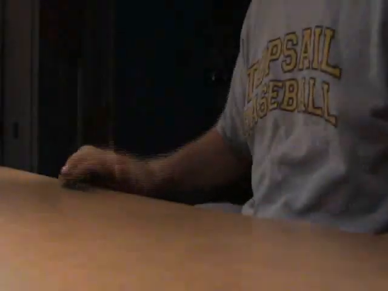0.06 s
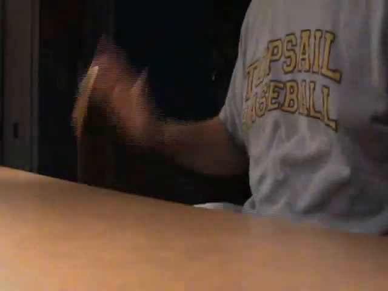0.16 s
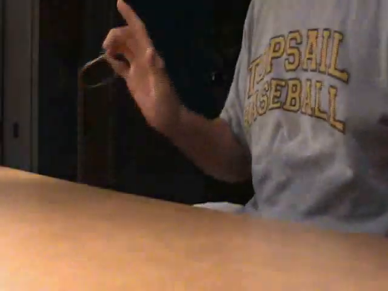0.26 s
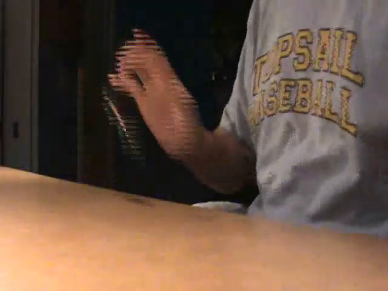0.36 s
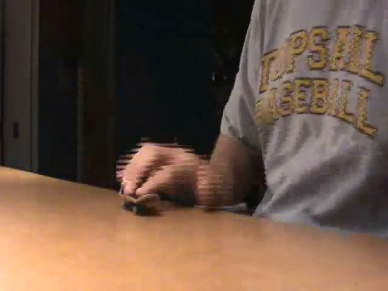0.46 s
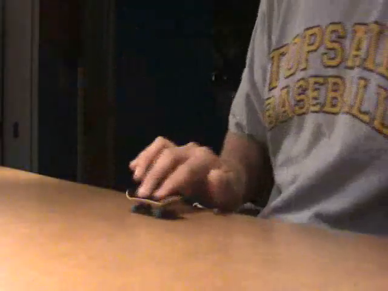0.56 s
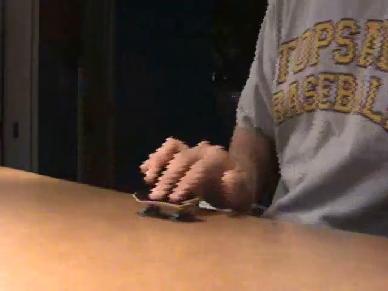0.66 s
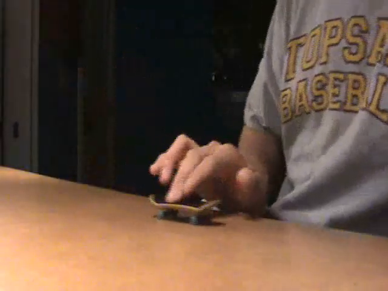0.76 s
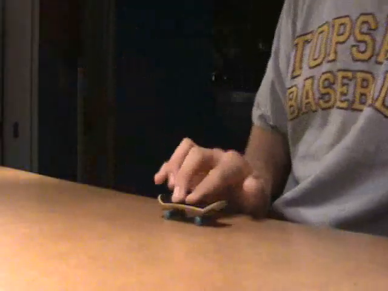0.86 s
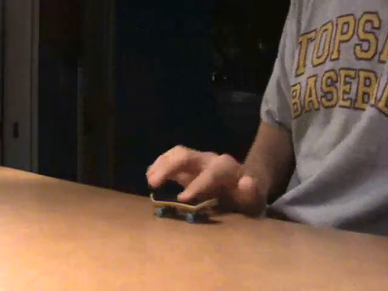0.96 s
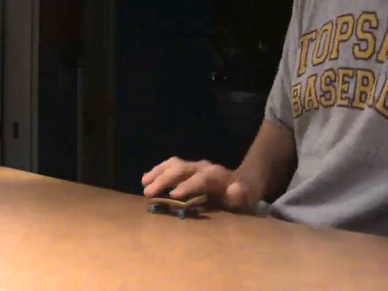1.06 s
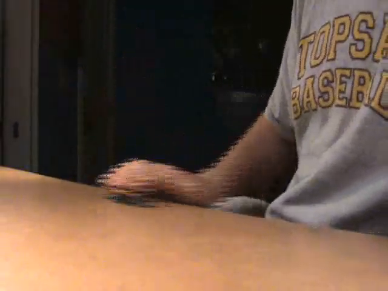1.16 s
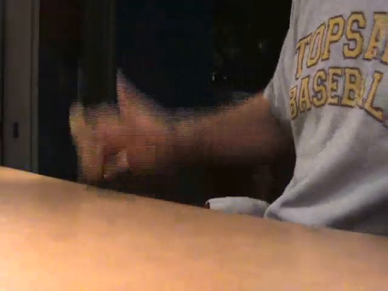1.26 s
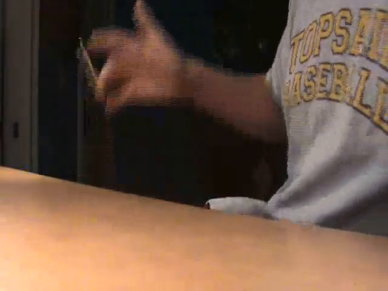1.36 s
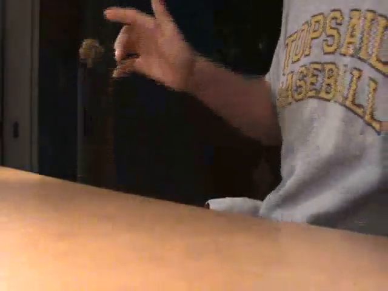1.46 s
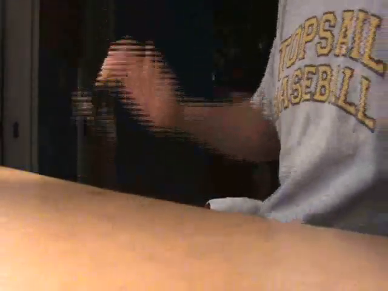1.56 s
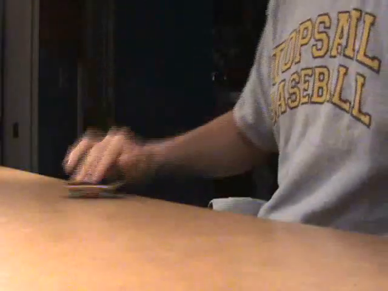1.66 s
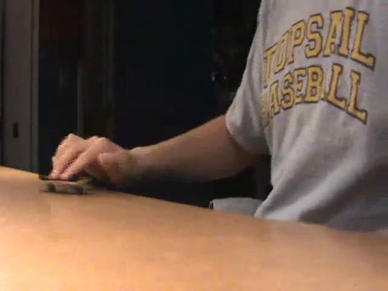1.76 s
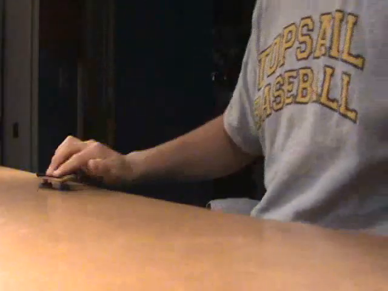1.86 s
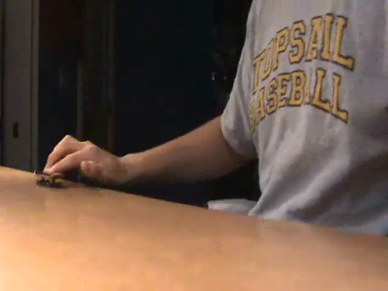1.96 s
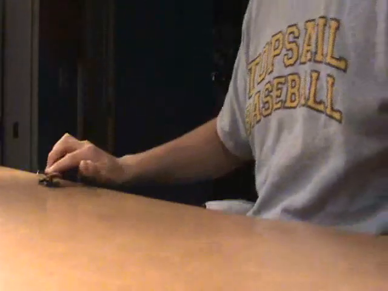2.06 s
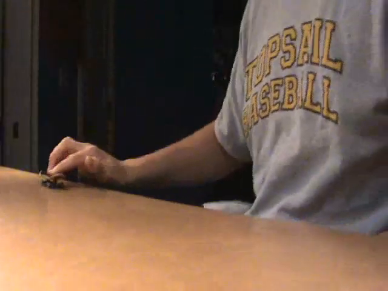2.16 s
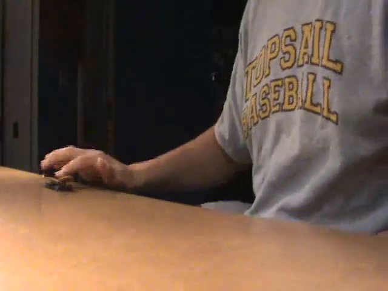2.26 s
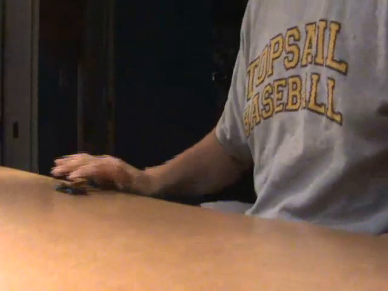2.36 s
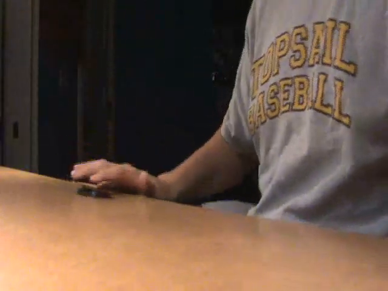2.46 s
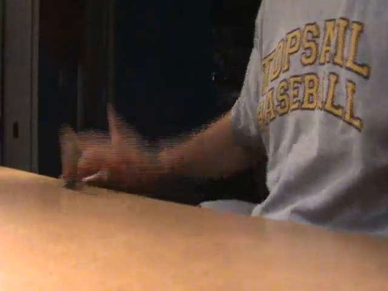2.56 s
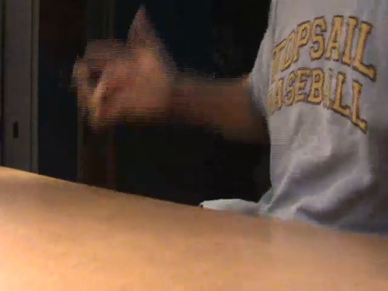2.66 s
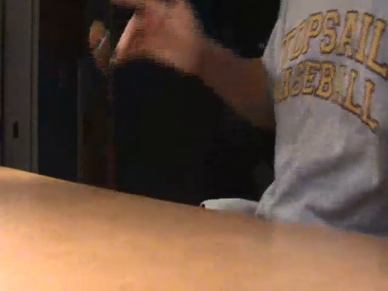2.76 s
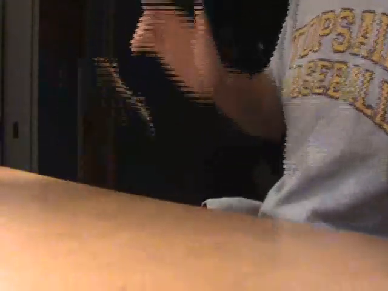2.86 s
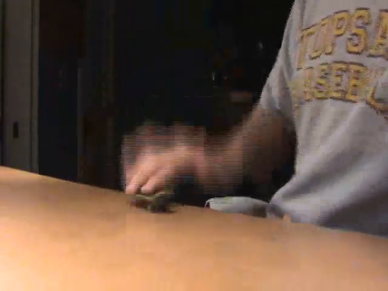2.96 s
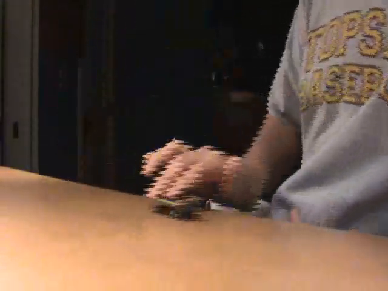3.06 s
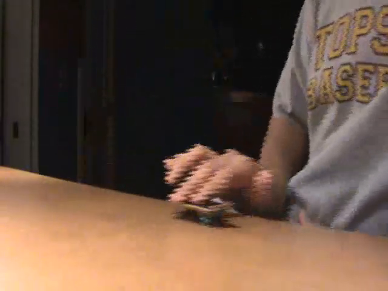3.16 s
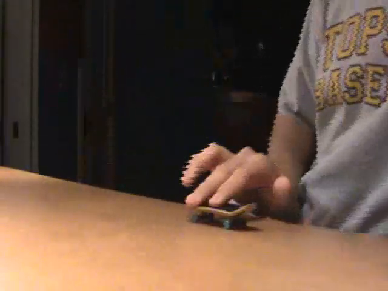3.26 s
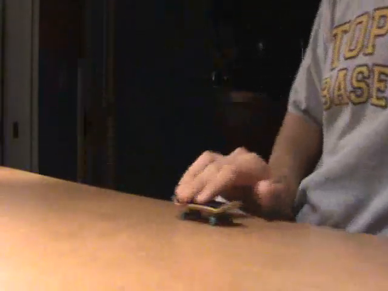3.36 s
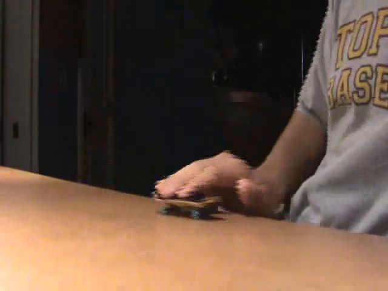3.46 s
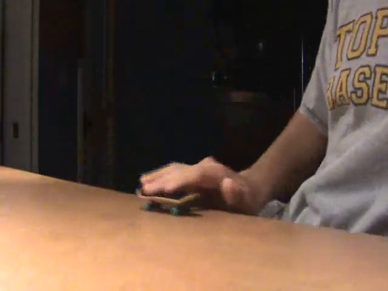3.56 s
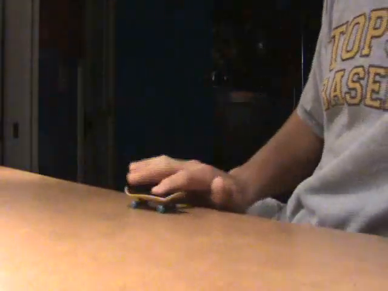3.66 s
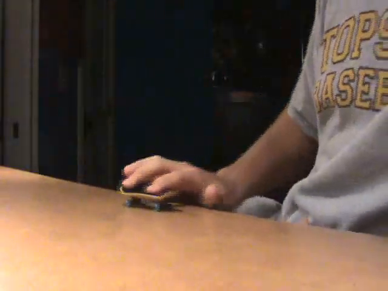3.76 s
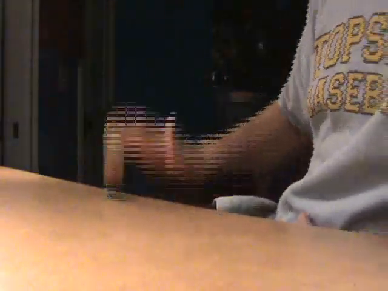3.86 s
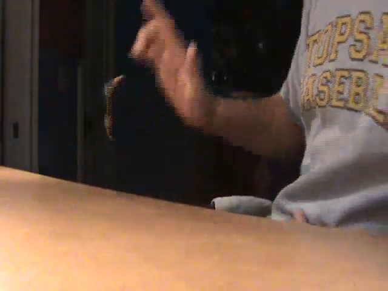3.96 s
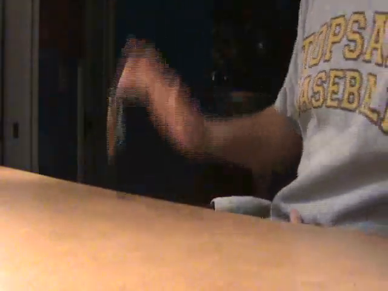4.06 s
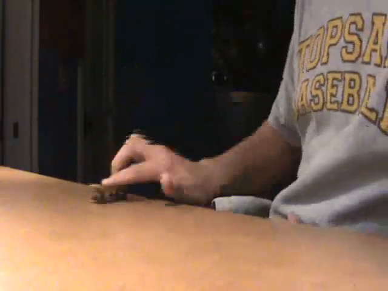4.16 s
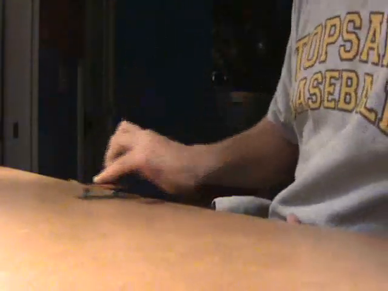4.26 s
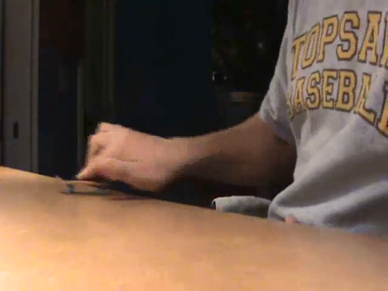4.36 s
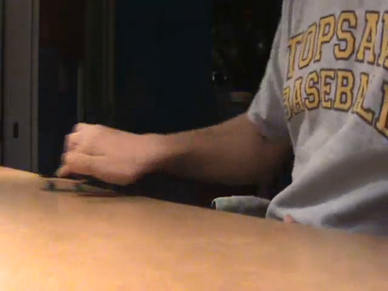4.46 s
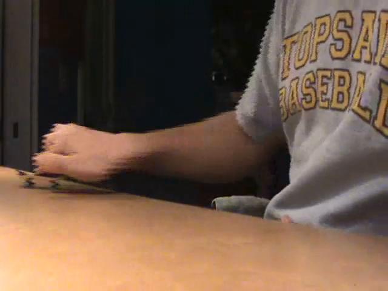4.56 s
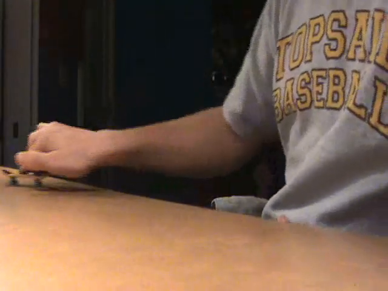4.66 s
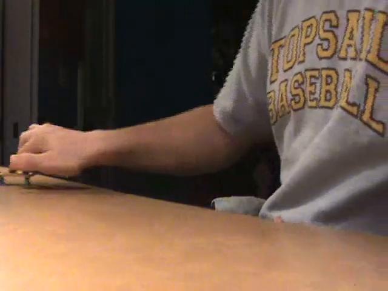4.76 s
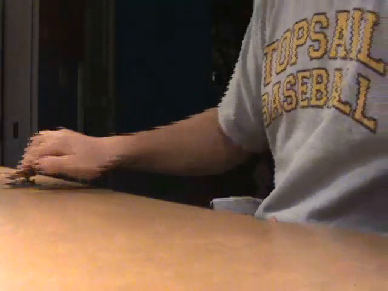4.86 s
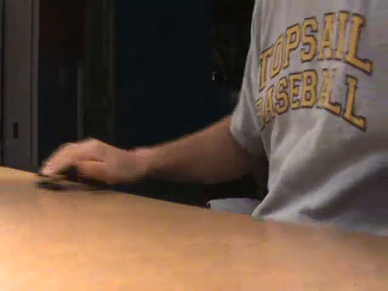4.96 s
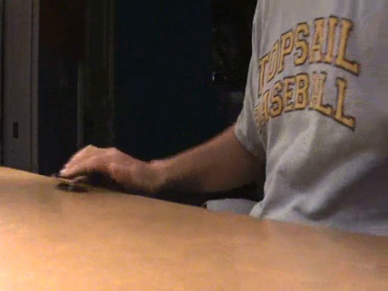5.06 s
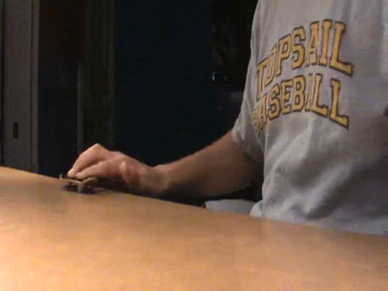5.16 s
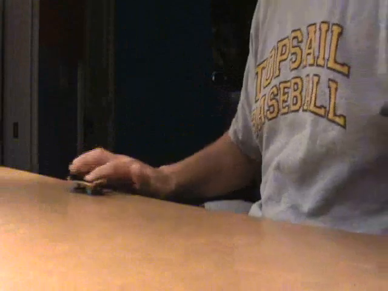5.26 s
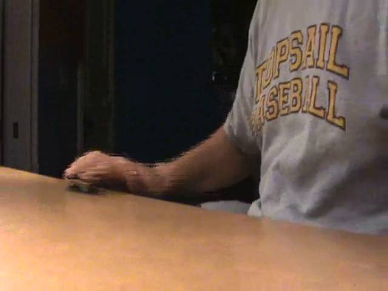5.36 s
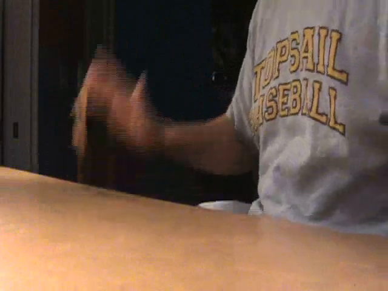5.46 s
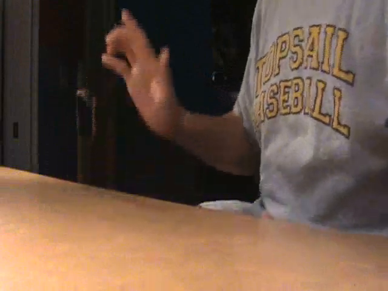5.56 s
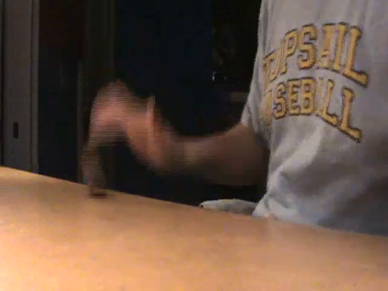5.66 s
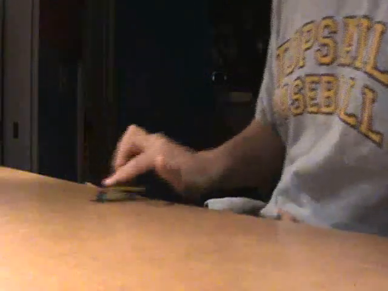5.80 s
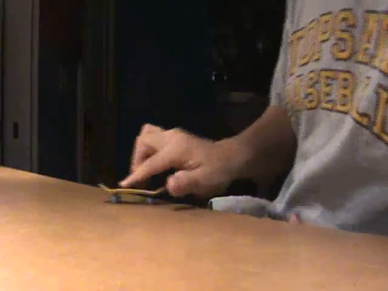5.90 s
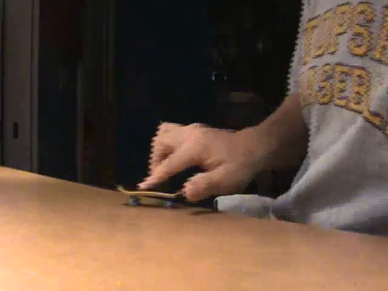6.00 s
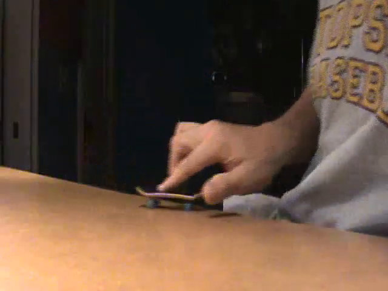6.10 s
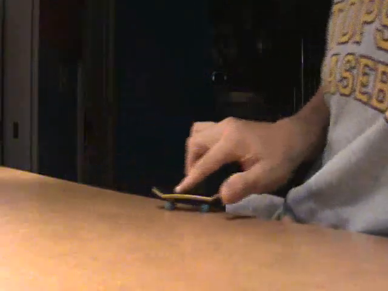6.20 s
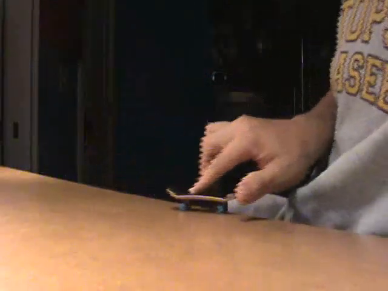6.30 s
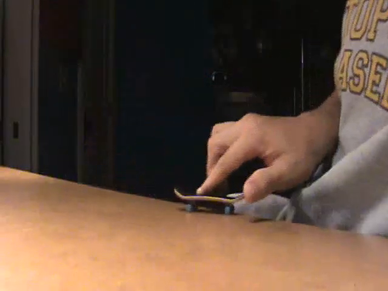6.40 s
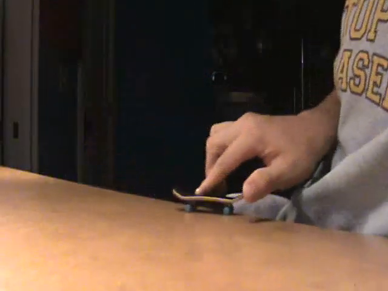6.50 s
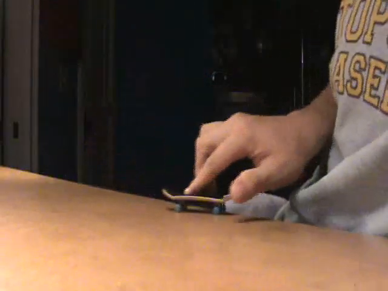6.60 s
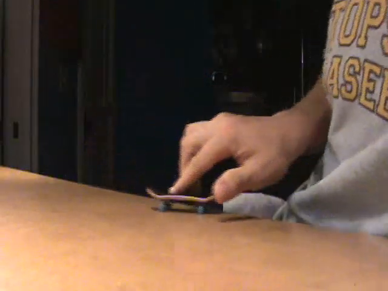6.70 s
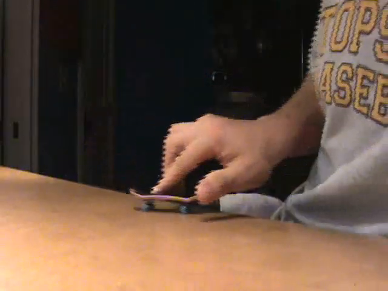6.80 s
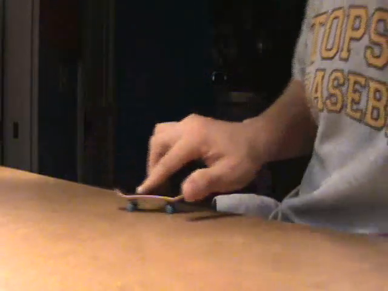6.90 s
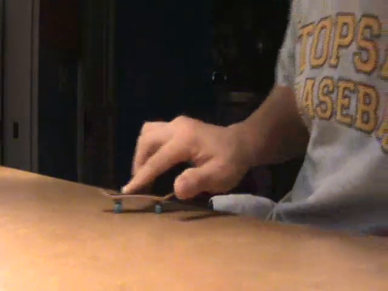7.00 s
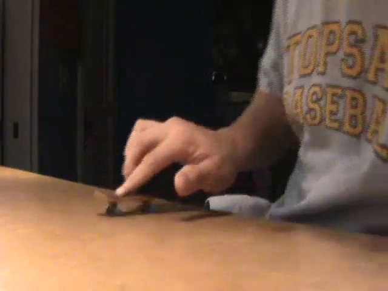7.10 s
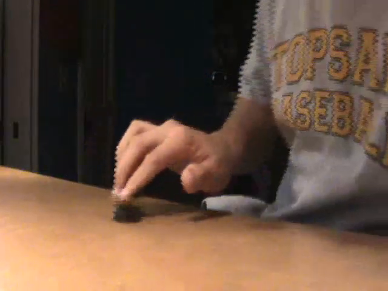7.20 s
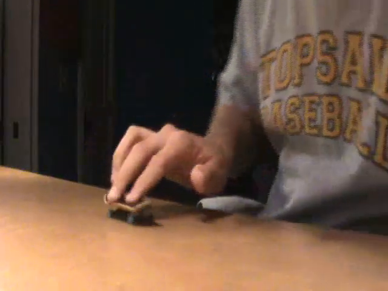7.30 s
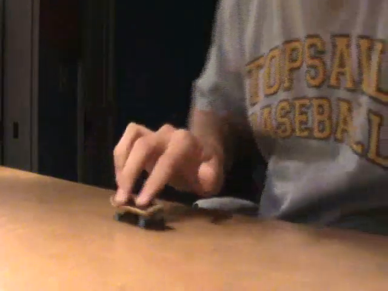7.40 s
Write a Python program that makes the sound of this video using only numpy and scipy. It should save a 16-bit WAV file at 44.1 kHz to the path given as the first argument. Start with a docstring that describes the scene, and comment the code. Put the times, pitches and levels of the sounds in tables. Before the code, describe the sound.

Close to a wooden table in a small live room, a toy skateboard rolls to and fro with a grainy, hollow drone. Five times its tail snaps brightly, the rolling stops for about a third of a second, then trucks and deck hit in sharp clustered clacks with rattling wheels. Soft finger thuds and faint swishes lie beneath; quiet room noise, low hum and thin whine continue.

```python
"""A small room, microphone close to a table: a fingerboard rolls to and fro on the table top.
Five times its tail snaps on the wood as a few short rings, it flies, lands in sharp blows of
trucks and deck on chattering wheels, and rolls on. Rolling is dense random impacts passed through
the top's resonances, so the table drones; an echo and a diffuse tail answer the board's sounds.
Soft thuds, swishes and a low rub lie beneath, over steady room noise, a hum and a thin whine."""
import sys
import numpy as np
from scipy import signal
from scipy.fft import rfft, irfft, next_fast_len
from scipy.io import wavfile
from scipy.ndimage import map_coordinates

SR = 44100
rng = np.random.default_rng(int(sys.argv[2]) if len(sys.argv) > 2 else 0)


def bounce(signal):
    """Save signal as a 16-bit WAV file at the path given by the first command-line argument."""
    frames = np.transpose(np.atleast_2d(signal))
    limited = np.clip(frames, -1, 1)
    pcm = np.round(limited * 32767).astype(np.int16)
    wavfile.write(sys.argv[1], SR, pcm)


N = 328104

# the tail snaps on the table: (time [s], snap level [dB], swish level [dB])
SNAPS = [(.295, -4, -42), (1.4412, -4.5, -38.5), (2.7675, -6, -38.5), (4.061, -6, -46), (5.6157, -6, -45.5)]
# the board comes down on its two trucks and slaps flat; each contact rebounds once:
# (first truck [s], second truck [s], truck level [dB], truck tilt [dB per octave], slap [s],
#  slap level [dB], slap tilt [dB per octave], rebound after [s], rebound loss [dB])
TOUCHDOWNS = [(0.6152, 0.645, -5, -1, .652, -7.5, -4.5, .0135, 9),
              (1.818, 1.835, -5.5, -3.5, 1.868, -6, -3, 0.014, 14),
              (3.146, 3.155, -7.5, -1.5, 3.15, -5, -3.5, .016, 8),
              (4.331, 4.337, -6.5, -1.5, 4.359, -10.5, 10, .008, 10),
              (5.8773, 5.898, -6, 2, 5.95, -6, -6, .008, 0.5)]


def amp(db):
    """Decibels to gain."""
    return 10 ** (np.asarray(db) / 20)


def unit(x):
    """Scale to rms 1."""
    return x / np.sqrt(np.mean(x ** 2) + 1e-20)


def along(points, hz):
    """Read (Hz, value) points on a log axis."""
    f, v = np.transpose(points)
    return np.interp(np.log(hz + 1), np.log(f + 1), v)


def clock():
    """The time of every sample [s]."""
    return np.arange(N) / SR


def add(track, s, sound):
    """Mix a sound into a track at time s."""
    part = track[max(round(s * SR), 0):][:len(sound)]
    part += sound[:len(part)]


def wobble(rate):
    """A smooth random curve, rate knots a second."""
    knots = np.random.default_rng(rng.integers(2 ** 30)).standard_normal(int(N * rate / SR) + 4)
    return map_coordinates(knots, [clock() * rate], mode="nearest")


def filtered(x, response):
    """x times a response of frequency."""
    n = x.shape[-1]
    m = next_fast_len(n + SR // 2, True)
    return irfft(rfft(x, m) * response(np.fft.rfftfreq(m, 1 / SR)), m)[..., :n]


def causal(gain_db, size=1024):
    """The impulse response with this gain that starts at once (minimum phase)."""
    cepstrum = irfft(np.log(amp(gain_db(np.fft.rfftfreq(size, 1 / SR)))))
    cepstrum[1:size // 2] *= 2
    cepstrum[size // 2 + 1:] = 0
    return irfft(np.exp(rfft(cepstrum)))


def bumps(rate, size=N):
    """Tiny impacts at random moments, about rate a second; rms 1."""
    return unit((rng.random(size) < rate / SR) * rng.standard_normal(size))


def on_table(x, spectrum):
    """Colour a contact force and pass it through the table top's resonances; rms 1."""
    # resonances and dips of the top: (centre [Hz], width [Hz], lift [dB])
    top = [(229.5, 20, 10), (495.6, 10, 6), (838.6, 13, 6.5), (1078, 190, 5), (1252, 14, 3.5),
           (1414, 50, -1.5), (1547, 18, 7.5), (1730, 66, 5), (1970, 69, 1.5), (2970, 60, -1.5),
           (4140, 80, -1)]

    def gain(hz):
        lift_db = sum(db / (1 + (2 * (hz - centre) / width) ** 2) for centre, width, db in top)
        return amp(along(spectrum, hz) + lift_db)

    return unit(filtered(x, gain))


def moving_band(x, centre_hz, sharpness, size=512):
    """A resonance, applied twice, whose centre and sharpness follow curves; rms 1."""
    hz, s, z = signal.stft(x, SR, nperseg=size)
    ratio = (hz[:, None] + 1) / np.interp(s, clock(), centre_hz)
    q = np.interp(s, clock(), sharpness * np.ones(N))
    gain = 1 / (1 + (q * (ratio - 1 / ratio)) ** 2)
    gain = gain / np.linalg.norm(gain, axis=0)
    return unit(signal.istft(z * gain, SR, nperseg=size)[1][:N])


def rolling():
    """Wheels cross the grain of the top; the drone shifts with each push and stops in the air."""
    # skidding wheels broaden the drone: (scrape relative to drone [dB], sharpness [Q])
    focus_points = [(-13, 2.9), (-3, 1.4)]
    # skidding wheels: (frequency [Hz], level [dB per Hz])
    scrape_spectrum = [(1200, -45), (1800, 3), (2200, 4.5), (2900, 0.5), (3800, -4.5), (4500, -6.5),
                       (5500, -21.5), (8000, -53)]
    # fine bright hiss of the wheels: (frequency [Hz], level [dB per Hz])
    grit_spectrum = [(2500, -21.5), (3800, -0.5), (4500, 2), (5600, -4), (7100, 2.5), (8400, -6),
                     (9700, -4.5), (11000, -21.5), (13000, -55)]
    # hollow rumble of the top: (frequency [Hz], level [dB per Hz])
    rumble_spectrum = [(25, -33), (60, -24), (150, -33), (300, -10.5), (550, 0.5), (680, -1), (820, 3),
                       (1050, -6.5), (2000, -13), (5000, -68)]
    drone_gain, rumble_gain, scrape_gain, grit_gain, centre_hz = wheel_levels()
    flutter = wobble(109.8)  # wheels slightly out of round; knots a second
    lurch = amp(0.44 * wobble(22))  # the fingers press unevenly
    focus = np.interp(20 * np.log10(scrape_gain / drone_gain), *np.transpose(focus_points))
    force = on_table(bumps(12000), [(600, -2.5), (950, -2), (1700, 2), (2300, -1)])
    drone = moving_band(force, centre_hz, focus) * drone_gain * amp(1.25 * flutter - 1.0)
    rumble = on_table(bumps(8000), rumble_spectrum) * rumble_gain * amp(.91 * flutter - 2.5)
    scrape = on_table(bumps(18000), scrape_spectrum) * scrape_gain * amp(0.64 * flutter - 1.5)
    grit = on_table(bumps(18000), grit_spectrum) * grit_gain * amp(1.2 * flutter - 4)
    return on_ground() * (lurch * (drone + rumble) + scrape + grit)


def wheel_levels():
    """Pushes and skids add in power: gains of drone, rumble, scrape and grit, and the drone's centre."""
    # each push of the board: (start [s], time its speed curve peaks, which may lie just outside
    # the push [s], end [s], drone level [dB], build-up [dB], run-down [dB], drone centre [Hz],
    # rumble relative to drone [dB], hiss relative to drone [dB])
    pushes = [(0.101, .1, 0.11, -40, 3, 5, 1150, -4, -8),
              (0.173, 0.264, 0.27, -28, 11, 6.5, 1430, -10, -15.5),
              (.72, 0.735, 0.99, -26, -3, 15, 1374, -12.5, -12),
              (1.029, 1.039, 1.054, -29, 5, 6, 1320, -12.5, -18),
              (1.126, 1.34, 1.41, -22.5, 11, 4, 1406, -17.5, -12.5),
              (1.904, 2.077, 2.209, -23, -0.5, 10.5, 1245, -9, -9),
              (2.28, 2.302, 2.33, -40, 3, -0.5, 1210, -7.5, -20),
              (2.381, 2.47, 2.74, -29.5, 2, -1.5, 1120, -6.5, -12),
              (3.253, 3.27, 3.42, -28, -2.5, 12, 1450, -15, -10),
              (3.535, 3.55, 3.8, -31.5, 0.5, 5, 1340, -7, -10),
              (3.956, 4.005, 4.015, -17, 18.5, 4, 1560, -19.5, -19),
              (4.47, 4.53, 4.93, -25.5, 1.5, 3, 1467, -16, -10.5),
              (4.943, 4.95, 5.06, -22, 0.5, 10, 1355, -24, -16),
              (5.12, 5.216, 5.29, -27, 8, 8, 1050, -1.5, -9.5),
              (5.453, 5.555, 5.6, -28, 7, 5, 1450, -10, -14),
              (5.93, 6.02, 6.53, -25, 2, 11.5, 1310, -13.5, -16.5),
              (6.69, 6.72, 6.7, -45, 3, -2, 1220, -15, -26),
              (6.82, 6.92, 7.22, -32.5, 10.5, 10.5, 1265, -11.5, -16),
              (7.36, 7.412, 7.47, -26.5, 14.5, 5.5, 1550, -12.5, -11)]
    # wheels slip sideways in a turn or before a jump: (start [s], time towards which the slip
    # grows, which may lie past the end [s], end [s], scrape level [dB], grit level [dB])
    skids = [(0.23, 0.262, .28, -34, -36), (1.289, 1.402, 1.424, -23, -17.5),
             (2.042, 2.075, 2.134, -29.5, -50), (2.55, 2.62, 2.71, -29, -32.5),
             (2.69, 2.733, 2.75, -25.5, -31), (3.968, 4.028, 4.05, -20.5, -23),
             (4.983, 5.17, 5.274, -31.5, -31.5), (5.536, 5.566, 5.6, -33.5, -35),
             (6.094, 6.126, 6.27, -35.5, -35), (6.895, 6.9, 7.2, -51, -43), (7.11, 7.43, 7.4, -36.5, -37.5)]
    hiss_grows, rise_oct_per_db = 1.124, 0.0167  # with speed hiss outgrows drone, and drone rises
    # between pushes the board never quite rests
    creep_db, creep_hz, creep_rumble_db, creep_hiss_db = -50, 1285, -7.5, -12
    drone = np.full(N, amp(creep_db) ** 2)
    rumble = drone * amp(creep_rumble_db) ** 2
    hiss = drone * amp(creep_hiss_db) ** 2
    centre = drone * creep_hz  # weighted by power
    for start, curve_peak, end, db, build_db, run_down_db, hz, rumble_db, hiss_db in pushes:
        gate, speed_db = stroke(start, curve_peak, end, build_db, run_down_db)
        power = (gate * amp(db + speed_db)) ** 2
        drone += power
        centre += power * hz * 2 ** (rise_oct_per_db * speed_db)
        rumble += power * amp(rumble_db) ** 2
        hiss += (gate * amp(db + hiss_db + hiss_grows * speed_db)) ** 2
    # a bright hiss and a rumble die away at the outset
    scrape = hiss.copy()
    grit = hiss + amp(-30 - 187 * clock()) ** 2
    rumble += amp(-32.5 - 400 * clock()) ** 2
    for start, grows_towards, end, scrape_db, grit_db in skids:
        # the slip swells, and most skids ease before the wheels grip
        gate, slip_db = stroke(start, grows_towards, end, build_db=15, ease_db=6)
        power = (gate * amp(slip_db)) ** 2
        scrape += power * amp(scrape_db) ** 2
        grit += power * amp(grit_db) ** 2
    return *np.sqrt([drone, rumble, scrape, grit]), centre / drone


def stroke(start, curve_peak, end, build_db, ease_db):
    """One movement of the hand: its gate (0-1), and its strength curve [dB], 0 at curve_peak."""
    t = clock()
    start_s, stop_s = 0.027, .025  # wheels get going, come to rest
    gate = np.interp(t, [start - start_s, start, end, end + stop_s], [0, 1, 1, 0])
    return gate, np.interp(t, [start, curve_peak, end], [-build_db, 0, -ease_db])


def on_ground():
    """1 while the wheels touch the table, 0 from each pop to its landing."""
    t = clock()
    flights = [(t > snap[0]) & (t < landing[0]) for snap, landing in zip(SNAPS, TOUCHDOWNS)]
    return 1. - np.any(flights, axis=0)


def pops():
    """The hard tail hits once and its modes ring for a few milliseconds."""
    # ringing of the snapped tail, scattered at each hit: (mean frequency [Hz], mean level [dB], t60 [s])
    tail_modes = [(594, -25.5, 0.01), (1810, -20, 0.0037), (3290, -27, 0.012), (4450, -61, 0.0026),
                  (5570, -14.5, 0.0029), (6830, 4, 0.0023), (7390, -4, 0.0037), (9290, -1, 0.0022)]
    out, t = np.zeros(N), np.arange(SR // 20) / SR
    hz, db, t60 = np.transpose(tail_modes)[:, :, None]
    for s, level_db, _ in SNAPS:
        detune, strength = rng.standard_normal((2, len(tail_modes), 1))
        decay = amp(db + 1.0 * strength - 60 * t / t60)
        ring = np.sum(decay * np.sin(2 * np.pi * hz * (1 + 0.039 * detune) * t), axis=0)
        ring = ring * (1 - np.exp(-t / .0002))  # soften the onset
        add(out, s, amp(level_db) * ring / np.abs(ring).max())
    return out


def clacks():
    """Each contact is a sharp blow with a brief buzz of the trucks: noise dying at two rates."""
    # a blow: (frequency [Hz], level before tilt [dB per Hz])
    clack_spectrum = [(60, -29.5), (500, -7), (900, -13), (1700, 2.5), (2700, -7.5), (4000, -4),
                      (5300, -7.5), (6800, -1.5), (8300, -9.5), (9800, -6), (11500, -33), (14000, -55)]
    out, t = np.zeros(N), np.arange(SR // 30) / SR
    for s, db, tilt_db in contacts():
        decay = amp(-60 * t / .014) + amp(-19) * amp(-60 * t / .04)  # blow + buzz
        force = rng.choice([-1, 1], len(t)) * decay
        body = causal(lambda hz: along(clack_spectrum, hz) + tilt_db * np.log2(np.maximum(hz, 1000)))
        clack = signal.fftconvolve(force, body)
        add(out, s, amp(db + 11.0) * clack / np.linalg.norm(clack))
    return out


def contacts():
    """Every blow as (s, dB, tilt): jolts, a knock at each pop, three contacts a landing with rebounds."""
    # the board jolts under the fingers while it rolls:
    # (time [s], level [dB], treble tilt [dB per octave])
    jolts = [(.0949, -24.5, -4.5), (1.027, -31.5, 4), (3.53, -27, -6), (3.729, -16, -0.5),
             (4.94, -23, -2.5), (5.158, -17.5, 2), (5.361, -15.5, -3), (5.368, -19.5, -13),
             (5.543, -28, -12), (6.037, -13.5, -4.5), (6.713, -33, -13), (6.832, -35, -15),
             (6.878, -29.5, -1), (7.021, -25, -5), (7.406, -15, -3.5)]
    blows = jolts + [(s, -21, -9) for s, *_ in SNAPS]  # the deck knocks dully as its tail snaps down
    for first, second, truck_db, truck_tilt, slap, slap_db, slap_tilt, flight_s, loss_db in TOUCHDOWNS:
        trucks = [(first, truck_db, truck_tilt), (second, truck_db, truck_tilt)]
        for s, db, tilt in trucks + [(slap, slap_db, slap_tilt)]:
            blows += [(s, db, tilt), (s + flight_s, db - loss_db, tilt)]
    return blows


def chatter():
    """Dense tiny bounces swell until the fingers pin the board; they ring trucks and shake the table."""
    # after each landing the loose trucks chatter: (peak [s], level [dB], tilt [dB per octave],
    # truck ring [Hz], table boom level [dB])
    rattles = [(.722, -24, 0.2, 4400, -39), (1.914, -19.5, 0.3, 4300, -38),
               (3.215, -20.5, 1.2, 4500, -33.5), (4.402, -20, 0.3, 4000, -39),
               (5.96, -21, 1.5, 4460, -34.5)]
    # the bounces: (frequency [Hz], level before tilt [dB per Hz])
    bounce_spectrum = [(100, -8.5), (300, -5), (700, -1), (900, -2.5), (1200, 0), (2000, 0.5), (2900, 1.5),
                       (4000, -5), (5400, -7.5), (7000, -1.5), (8300, -8), (9700, -6), (11500, -13),
                       (13500, -41)]
    # the shaken table: (frequency [Hz], level [dB per Hz])
    boom_spectrum = [(20, -30), (40, -5.5), (70, -3), (102, -3.5), (150, -8.5), (230, -7.5), (500, -6),
                     (2000, -54)]
    rise_db_per_s, fall_db_per_s = 85, 305  # the chatter swells, then is pinned
    loose_share = .38  # strength before the deck slaps flat
    rattle, boom = np.zeros((2, N))
    for landing, (peak_s, db, tilt_db, truck_hz, boom_db) in zip(TOUCHDOWNS, rattles):
        first, slap = landing[0], landing[4]
        t = first + np.arange(round(.4 * SR)) / SR
        settling = np.interp(t, [slap - .012, slap], [loose_share, 1])
        below_peak_db = np.maximum(rise_db_per_s * (peak_s - t), fall_db_per_s * (t - peak_s))
        swell = settling * amp(-below_peak_db)
        colour = [(hz, level + tilt_db * np.log2(hz / 2000)) for hz, level in bounce_spectrum]
        bounces = on_table(bumps(22000, size=len(t)), colour)
        trucks = unit(signal.lfilter(*signal.iirpeak(truck_hz, 5.5, SR), bounces))
        add(rattle, first, amp(db + 1.15) * swell * unit(bounces + amp(-6.5) * trucks))
        boom_times = [first, first + 0.018, peak_s + 0.024, peak_s + 0.078]
        add(boom, first, amp(boom_db) * np.interp(t, boom_times, [0, .87, .48, 0.025]))
    uneven = amp(.8 * wobble(220))
    return rattle * uneven + boom * on_table(bumps(2500), boom_spectrum)


def thuds():
    """Fingers press the board onto the table: soft pushes ring only the table's low modes."""
    # the presses: (time [s], level [dB])
    presses = [(.095, -40), (0.621, -32), (1.04, -37), (1.202, -39), (1.434, -41), (1.864, -33.5),
               (3.175, -23.5), (3.729, -39), (3.81, -40), (4.057, -41), (5.354, -37), (5.501, -46),
               (5.884, -29)]
    # low modes of the table, levels scattered at each press: (frequency [Hz], mean level [dB], t60 [s])
    table_modes = [(42, -24, .18), (66, -6.5, 0.27), (99, 11, 0.082), (162, -9.5, 0.19),
                   (214.6, -2.5, 0.27)]
    out, t = np.zeros(N), np.arange(SR // 3) / SR
    for s, level_db in presses:
        ring = np.zeros(len(t))
        for hz, db, t60 in table_modes:
            ring += amp(db + rng.normal(0, 3.4) - 60 * t / t60) * np.sin(2 * np.pi * hz * t)
        ring = ring * (1 - np.exp(-t / 0.003))  # a soft onset
        add(out, s, amp(level_db) * ring / np.abs(ring).max())
    return out


def swishes():
    """A dull swish of noise, falling in pitch, follows each pop as hand and board fly up."""
    t = clock()
    level, centre_hz = np.zeros(N), np.full(N, 400.)
    for s, _, db in SNAPS:
        level += amp(db) * np.interp(t - s, [0, .04, .085, .16], [0.013, 0.99, 0.16, 0.02])
        centre_hz = np.where(t > s, np.interp(t - s, [0, .1], [420, 270]), centre_hz)
    return level * moving_band(rng.standard_normal(N), centre_hz, sharpness=2.2)


def low_rub():
    """A soft low rubbing, fading while the hand slows the board and turns it back."""
    # a low rub already fading when it enters: (start [s], time its fade is reckoned from [s],
    # end [s], level [dB], build-up (none) [dB], run-down [dB])
    rub = (6.5, 6, 7, -48, 0, 11)
    start, fade_from, end, db, build_db, ease_db = rub
    gate, fade_db = stroke(start, fade_from, end, build_db, ease_db)
    spectrum = [(60, -12), (130, -5), (210, -4), (330, -7.5), (600, -12), (2000, -60)]
    return gate * amp(db + fade_db) * on_table(bumps(4400), spectrum)


def in_room(x, wet_db, echo_db, direct_side_db, colour):
    """Direct sound, a ceiling echo and the walls' diffuse tail, heard in stereo."""
    # decay of the room: (frequency [Hz], t60 [s])
    room_t60 = [(100, 0.38), (400, 0.4), (1500, 0.44), (5000, 0.4), (10000, 0.34)]
    # stereo width: (frequency [Hz], side level [dB])
    side_width = [(40, -19), (100, -15), (200, -8), (500, -2.5), (1200, -4.5), (2500, -4), (4000, -7),
                  (5500, -14), (7500, -13), (10000, -7.5), (12000, 13)]
    hz, s, z = signal.stft(rng.standard_normal((2, SR // 2)), SR, nperseg=256)
    decay = amp(-60 * s / along(room_t60, hz)[:, None])
    tail = signal.istft(z * decay, SR, nperseg=256)[1]
    tail_s = np.arange(tail.shape[1]) / SR
    tail = tail * np.interp(tail_s, [0, .003, .019, .03], [0, 0.38, 0.25, 0.6])  # far walls answer late
    tail = tail * amp(wet_db) / np.linalg.norm(tail[0])
    tail[0, round(SR / 50)] += amp(echo_db)  # the ceiling, after 20 ms
    reply = signal.fftconvolve(x[None], tail, axes=1)[:, :N]
    mid, side = filtered(reply, lambda hz: amp(along(colour, hz)))
    # the board is a little off axis: its side signal is a quarter cycle from the direct sound
    side = side + filtered(x, lambda hz: 1j * amp(direct_side_db))
    side = filtered(side, lambda hz: amp(along(side_width, hz)))
    return np.array([x + mid + side, x + mid - side])


def hush():
    """Steady room noise, a faint hum and a thin electrical whine, both wavering in phase."""
    # room noise: (frequency [Hz], relative level [dB per Hz])
    hush_spectrum = [(15, -28), (25, -1), (95, -3.5), (207, -0.5), (300, -14), (750, -19), (1900, -15.5),
                     (3000, -20), (4200, -17.5), (10000, -24), (13000, -27.5), (15000, -43)]
    mid, side = filtered(rng.standard_normal((2, N)), lambda hz: amp(along(hush_spectrum, hz)))
    noise = amp(-57) * unit(np.array([mid + 0.38 * side, mid - 0.3 * side]))
    hum = amp(-66.0) * np.sin(2 * np.pi * 188 * clock() + .5 * wobble(4))
    whine = amp(-71) * np.sin(2 * np.pi * 12263 * clock() + .8 * wobble(30))
    return noise + hum + whine


def scene():
    """Board, table and room."""
    # the board's sounds as the walls return them: (frequency [Hz], level [dB])
    room_colour = [(100, 6), (400, -0.5), (900, -3.5), (2000, -4), (4200, 0.5), (7000, -2), (11000, -3)]
    # the snap as the walls return it: (frequency [Hz], level [dB])
    snap_colour = [(100, 8), (400, 1.5), (900, -2.5), (2000, 1), (3200, 5.5), (4200, 8), (5400, 1),
                   (6600, -7), (8000, -6), (10000, -3.5)]
    wheels = in_room(rolling(), wet_db=-6.5, echo_db=-17.5, direct_side_db=-1.5, colour=room_colour)
    snaps = in_room(pops(), wet_db=3.5, echo_db=-7, direct_side_db=-2.5, colour=snap_colour)
    blows = clacks() + chatter()
    landings = in_room(blows, wet_db=-2.0, echo_db=-16.0, direct_side_db=-2, colour=room_colour)
    soft = thuds() + swishes() + low_rub()
    lows = in_room(soft, wet_db=-9.5, echo_db=-21, direct_side_db=-7, colour=room_colour)
    treble = [(10800, 0.5), (12200, -5), (14000, -17)]  # the highest treble falls away
    board = filtered(wheels + snaps + landings + lows, lambda hz: amp(along(treble, hz)))
    return board * amp([[.35], [-.35]]) + hush()  # the board a little louder on the left [dB]


def record(dry):
    """The microphone keeps nothing above its band limit of 15500 Hz."""
    return filtered(dry, lambda hz: hz < 15500)


dry = scene()
out = record(dry)
bounce(out)
```